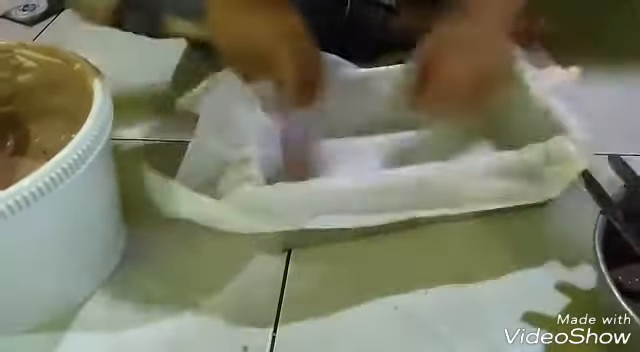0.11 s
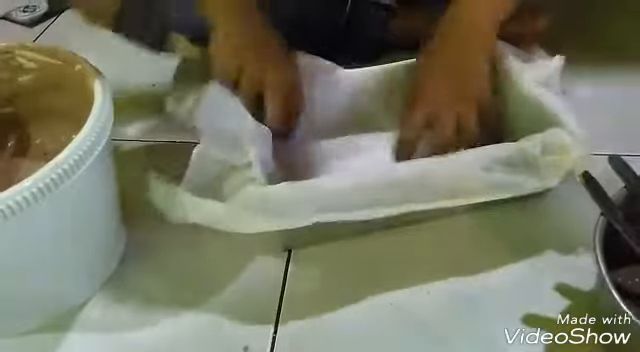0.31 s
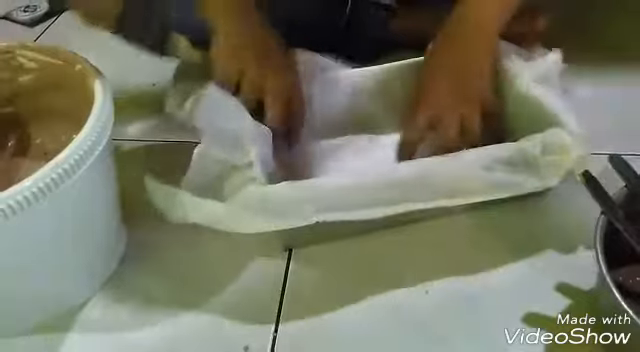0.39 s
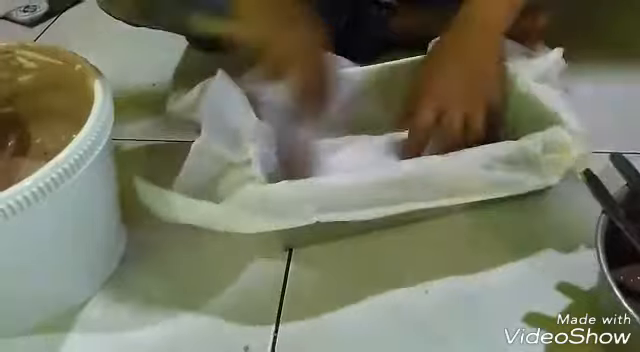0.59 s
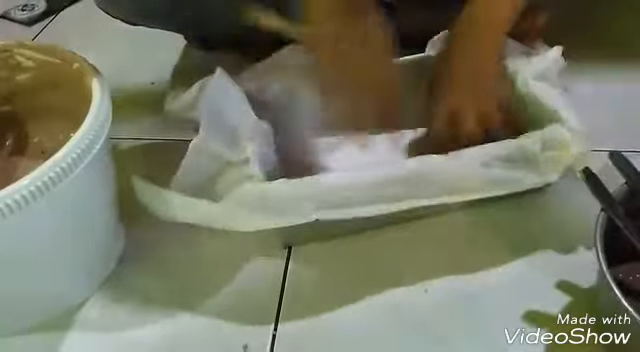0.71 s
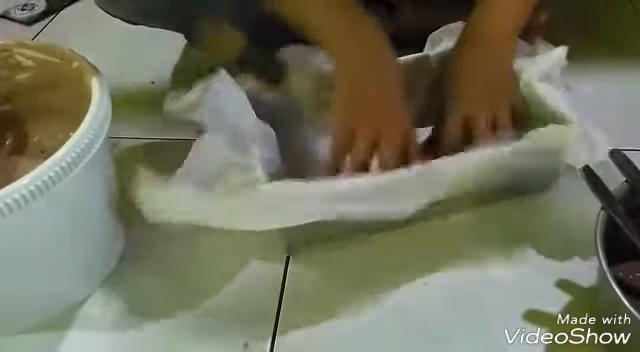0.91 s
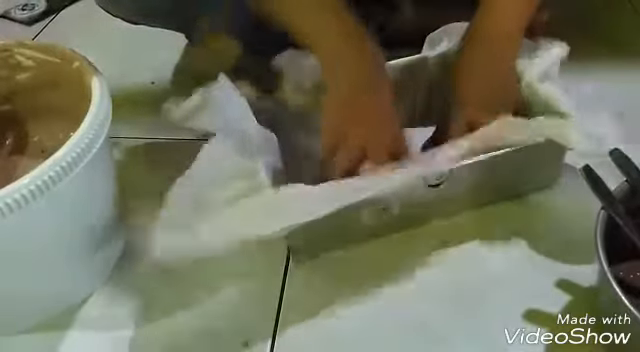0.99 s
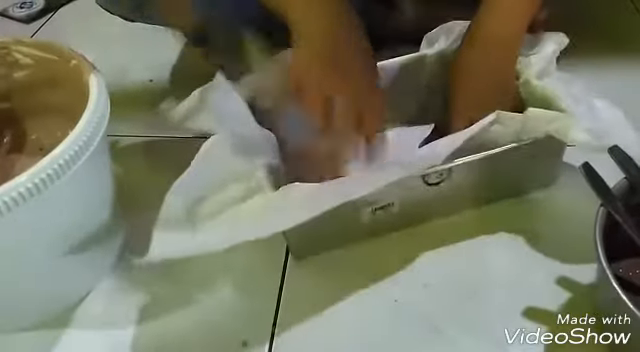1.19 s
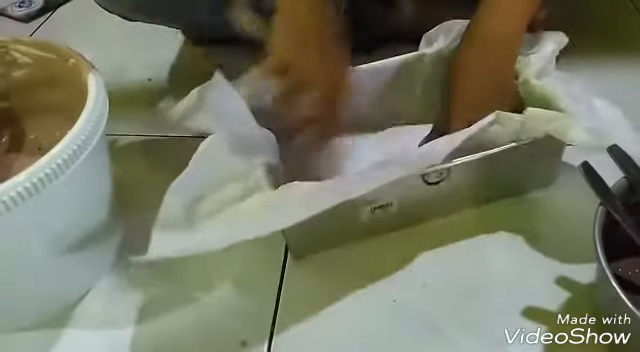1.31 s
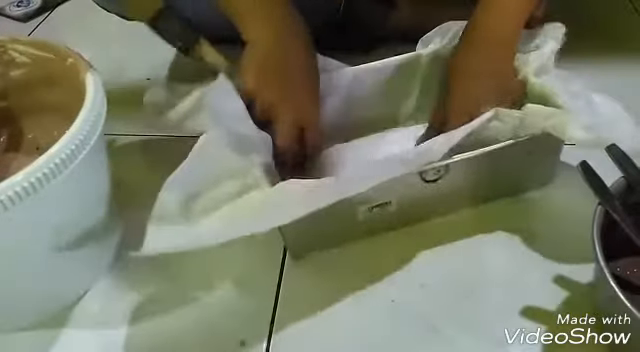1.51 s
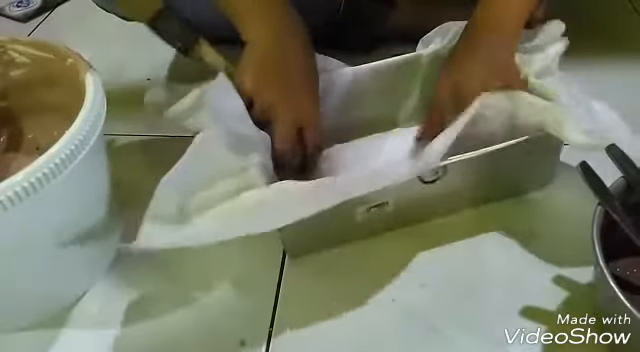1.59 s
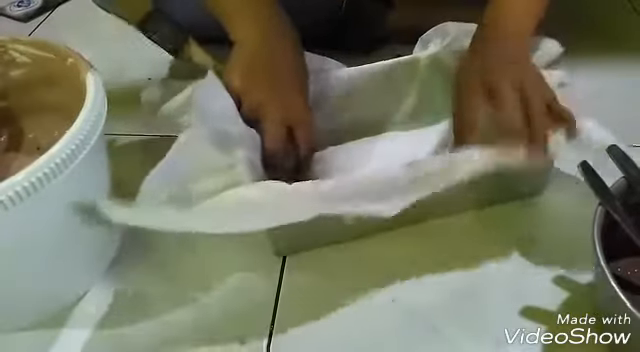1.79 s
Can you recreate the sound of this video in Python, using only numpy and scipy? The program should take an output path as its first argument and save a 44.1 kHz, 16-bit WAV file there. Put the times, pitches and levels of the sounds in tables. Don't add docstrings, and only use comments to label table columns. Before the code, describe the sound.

Bright, dry paper crinkling starts at once, smacks the tin early, then comes in dense loud clusters with short lulls between; faint finger taps on metal, short room echo, slightly overloaded close phone microphone.

```python
import sys
import numpy as np
from scipy import signal
from scipy.fft import rfft, irfft, next_fast_len
from scipy.io import wavfile
from scipy.ndimage import uniform_filter1d, minimum_filter1d, map_coordinates

SR = 44100
rng = np.random.default_rng(int(sys.argv[2]) if len(sys.argv) > 2 else 0)


def dump(signal):
    limited = np.clip(np.atleast_2d(signal).T, -1, 1)
    pcm = np.round(limited * 32767).astype(np.int16)
    wavfile.write(sys.argv[1], SR, pcm)


def to_linear_factor(level_db):
    exponent = np.asarray(level_db, float) / 20
    return 10 ** exponent


N = 83790
TIME_S = np.arange(N) / SR


def unit(x):
    return x / np.sqrt(np.mean(x ** 2) + 1e-20)


def along(points, hz):
    point_hz, value = np.transpose(points)
    return np.interp(np.log(hz + 1), np.log(point_hz + 1), value)


def filtered(x, response):
    size = next_fast_len(N + SR // 2)
    hz = np.fft.rfftfreq(size, 1 / SR)
    return irfft(rfft(x, size) * response(hz), size)[..., :N]


def wobble(rate_hz):
    knots = rng.standard_normal(int(N * rate_hz / SR) + 4)
    return map_coordinates(knots, [np.arange(N) * rate_hz / SR])


def coloured(spectrum, shared, lag_s):
    z = signal.stft(rng.standard_normal((2, N)), nperseg=512)[2]
    patches = uniform_filter1d(rng.standard_normal(z.shape[1:]), size=4, axis=0)
    patches = uniform_filter1d(patches, size=8, axis=1)
    patch_db = 3.5 * unit(patches)
    common, own = signal.istft(z * to_linear_factor(patch_db), nperseg=512)[1][:, :N]
    right = shared * common + np.sqrt(1 - shared ** 2) * own

    def colour_and_lag(hz):
        return to_linear_factor(along(spectrum, hz)) * np.exp(-2j * np.pi * hz * [[lag_s], [0]])

    return unit(filtered(np.array([common, right]), colour_and_lag))


def creases(rate_hz):
    chance, size = rng.random((2, N))
    spikes = (chance < rate_hz / SR) * to_linear_factor(-1.7 * np.log(size + .004))
    t = np.arange(SR // 20) / SR
    buckle = to_linear_factor(-60 * t / .005) * (1 - np.exp(-t / 0.000083))
    swarm = np.abs(signal.fftconvolve(spikes, buckle / buckle.max())[:N])
    return unit(swarm * to_linear_factor(1.2 * wobble(70.36)))


def held(start_s, length_s, change_db, attack_s, release_t60_s=0.05):
    since = TIME_S - start_s
    slope_db = change_db * np.clip(since / length_s - .5, -.5, .5)
    release_db = -60 * np.maximum(since - length_s, 0) / release_t60_s
    return np.clip(since / attack_s + (start_s == 0), 0, 1) * to_linear_factor(slope_db + release_db)


def half_widths(start_s, width_ms):
    return 2000 * (TIME_S - start_s) / max(width_ms, .5)


# start_s, length_s, level_db, tin_share_db, change_db over the press
PRESSES = [(0, 0.05, -27, -15.5, -6), (0.021, 0.051, -26, -10.5, 4.5), (0.086, 0.069, -50.5, 12.5, -17),
           (0.2043, 0.0037, -21, -16, 14), (0.292, 0.062, -28.5, -12, 6),
           (0.356, 0.048, -13.5, -6.5, -10.5), (0.409, 0.11, -17, -16, -2), (0.551, 0.052, -38.5, -6.5, 7),
           (0.608, 0.075, -25, -14.5, 5), (0.841, 0.034, -24, -12.5, 16), (0.891, 0.029, -18, -15.5, -2),
           (0.928, 0.025, -36.5, -3.5, 4), (0.959, 0.027, -22, -9, 8), (0.986, 0.19, -14.5, -15, -9.5),
           (1.182, 0.041, -24, -17, 4), (1.234, 0.1, -37.5, -12.5, -26), (1.383, 0.066, -49, -4, -5),
           (1.448, 0.034, -33, -15.5, 27.5), (1.479, 0.032, -14, -18, 11), (1.526, 0.061, -19.5, -17.5, 23),
           (1.635, 0.037, -34, -17, 9), (1.664, 0.09, -23.5, -13, -7), (1.755, 0.044, -31.5, -16, -1),
           (1.83, 0.067, -27.5, -9.5, -12), (1.803, 0.028, -35, -9, 0)]
# start_s, level_db, width_ms, tin_share_db
SNAPS = [(0.095, -11, 4, -33), (.102, -39, 2.7, -23), (.1426, -26.5, 4.6, -21), (.1605, -30, 2.5, -27),
         (0.2002, -30.5, 2.9, -6), (0.3456, -0.5, 5.6, -27.5), (.3885, -14, 4.3, -12),
         (0.4033, -5.5, 3.3, -17), (.428, -20, 3.8, -25), (.452, -8, 1.9, -30), (0.4605, 0, 2.2, -19),
         (0.4771, -1, 0.96, -41), (0.489, -3, 0.77, -47), (1.0101, -8, 1.3, -13.5), (0.4968, -7, 1.5, -35),
         (0.5225, -4, 4.4, -23), (0.5257, -6, 2.9, -26), (.5353, -2, 2.3, -31), (0.5446, 2.5, 2.6, -29),
         (0.709, -34, 4.4, -34), (0.791, -25.5, 2.3, -35), (0.85, -20, 1.6, -37), (.8573, -17, 2.4, -19),
         (0.87, 3.5, 1.8, -17.5), (0.8824, -13.5, 5.8, -14.5), (0.9108, -13, 6.2, -30),
         (0.9695, -7.5, 1.3, -23), (1.031, -5, 2.7, -18), (1.0693, -10, 2.5, -32), (1.113, -11, 1.3, -13.5),
         (1.1334, -12.5, 7.6, -17.5), (1.1543, -6, 4.8, -20.5), (1.17, -11.5, 3.1, -31),
         (1.222, -26, 2.4, -33), (1.3173, -28, 1.8, -29), (1.378, -22, 0.56, -45), (1.3816, -32, 3, -40),
         (1.387, -35, 1, -28), (1.3932, -35, 1.5, -24), (1.472, -18, 5.2, -41), (1.506, -7.5, 10, -32.5),
         (1.5182, -2.5, 5.6, -22), (1.5358, -18, 2.6, -30), (1.573, -15, 4.2, -25), (1.591, 2, 6.8, -20),
         (1.6155, 6, 3.7, -35.5), (1.677, -15, 9.3, -22), (1.683, -24, 1.9, -35), (1.766, -13, 5.5, -28),
         (1.782, -17, 7.2, -24.5)]
# freq_hz, level_db per hz
PAPER_COLOUR = [(1500, -42.5), (2500, -12.5), (3300, -12), (4100, -18), (5000, -9.5), (8000, -7.5),
                (10900, 2), (14200, -8)]
SHEET_SHARED, SHEET_LAG_S = 0.09, 0.0004965


def sheet():
    press = snap = 0
    for start_s, length_s, level_db, _, change_db in PRESSES:
        press = press + to_linear_factor(level_db) * held(start_s, length_s, change_db, 0.19 * length_s)
    for start_s, level_db, width_ms, _ in SNAPS:
        fall = half_widths(start_s, width_ms)
        rise = 1000 * (TIME_S - start_s) / (0.49 + 0.16 * width_ms)
        snap = snap + to_linear_factor(level_db - 5 - 6.57 * np.where(fall < 0, rise ** 2, fall))
    return (press * creases(5000) + snap) * coloured(PAPER_COLOUR, SHEET_SHARED, SHEET_LAG_S)


# freq_hz, level_db per hz
SLAP_COLOUR = [(500, -22.5), (3100, -7), (4100, -9), (5300, -2), (7300, -11.5), (9400, 5.5), (12000, -2),
               (13500, -12.5)]
# freq_hz, gain_db
SLAP_RIGHT_TOP = [(5000, -0.5), (8500, 1.5), (13000, 4)]


def slap():
    start_s, length_s, attack_s = .2112, 0.031, 0.0028
    smack = held(start_s, length_s, -7, attack_s, 0.014)
    shiver = to_linear_factor(-23) * held(start_s, length_s, 0, attack_s, 0.4) * (TIME_S < PRESSES[5][0])
    drive = to_linear_factor(-1.5) * (smack + shiver) * creases(5000)
    ports = drive * to_linear_factor([[0], [1]]) * coloured(SLAP_COLOUR, SHEET_SHARED, SHEET_LAG_S)
    return filtered(ports, lambda hz: to_linear_factor(along(SLAP_RIGHT_TOP, hz) * [[0], [1]]))


# freq_hz, level_db per hz
TIN_COLOUR = [(20, -44), (60, -11), (250, -2.5), (500, -5.5), (700, -1.5), (2000, -1), (3300, -8),
              (4200, -3)]


def tin():
    press = thud = 0
    for start_s, length_s, level_db, tin_share_db, change_db in PRESSES:
        shape = held(start_s, length_s, change_db, 0.19 * length_s)
        press = press + to_linear_factor(level_db + tin_share_db + 4) * shape
    for start_s, level_db, width_ms, tin_share_db in SNAPS:
        u = half_widths(start_s, width_ms)
        thud = thud + to_linear_factor(level_db + tin_share_db - 5.03 * np.where(u < 0, u * u, u / 4))
    body = (press * creases(2200) + thud) * coloured(TIN_COLOUR, 0.78, 0.000093)
    return filtered(body, lambda hz: 1 / (1 + (hz / 5000) ** 4))


# start_s, level_db, pitch_hz, t60_s
KNOCKS = [
    (.096, -29.5, 620, 0.022),
    (.116, -26.5, 1080, 0.017),
    (.133, -25.5, 1040, .018),
    (0.79, -40, 4140, 0.045),
    (1.3856, -21.5, 2890, 0.0065),
    (1.391, -28, 2750, 0.015),
]


def knocks():
    out = np.zeros(N)
    for start_s, level_db, pitch_hz, t60_s in KNOCKS:
        since = np.maximum(TIME_S - start_s, 0)
        ring = np.sin(2 * np.pi * pitch_hz * since + wobble(500)) + .15 * wobble(5000)
        rise = 1 - np.exp(-since / (0.056 * t60_s))
        out = out + to_linear_factor(level_db - 60 * since / t60_s) * rise * ring
    return out


# start_s, length_s, level_db, first_hz, last_hz, noise_over_tone, noise_width_hz
SQUEAKS = [
    (.755, .11, -50, 2250, 2480, .4, 120),
    (1.405, .08, -50, 3000, 2700, 3, 450),
]


def squeaks():
    out = np.zeros(N)
    for start_s, length_s, level_db, first_hz, last_hz, noisy, width_hz in SQUEAKS:
        u = np.clip((TIME_S - start_s) / length_s, 0, 1)
        glide_hz = first_hz + (last_hz - first_hz) * np.minimum(2 * u, 1) + 25 * wobble(150)
        rough = (1 + noisy * wobble(width_hz)) / np.hypot(1, noisy)
        swell = np.sqrt(np.abs(np.sin(np.pi * u))) * (u < 1)
        out = out + to_linear_factor(level_db) * rough * swell * np.sin(2 * np.pi * np.cumsum(glide_hz) / SR)
    return out


# freq_hz, t60_s
ROOM_DECAY = [(200, 0.27), (3000, 0.36), (12000, 0.18)]


def room(x):
    hz, t, z = signal.stft(rng.standard_normal((2, SR // 2)), SR, nperseg=256)
    decay = to_linear_factor(-60 * t / along(ROOM_DECAY, hz)[:, None])
    tail = signal.istft(z * decay, SR, nperseg=256)[1]
    delayed = np.pad(x, ((0, 0), (200, 0)))
    return signal.fftconvolve(delayed, tail / np.linalg.norm(tail[0]), axes=1)[:, :N]


# freq_hz, level_db per hz
FLOOR_COLOUR = [(25, -9), (300, -15), (1200, -24), (2600, -12), (4700, -29), (7000, -24), (10500, -16),
                (14500, -33)]


def kitchen_quiet():
    return to_linear_factor(-50.5 + 0.83 * wobble(8.1)) * coloured(FLOOR_COLOUR, 0.69, 0)


def scene():
    fingers = knocks() + squeaks()
    near = sheet() + slap() + tin() + np.array([fingers, -.5 * fingers])
    return near + to_linear_factor(-9.5) * room(near) + kitchen_quiet()


# freq_hz, rarity
DROPOUT_RARITY = [(60, 2), (450, 1.6), (650, 3), (2100, 2.3), (2600, 1.5), (3200, 2), (4200, 1.2),
                  (6500, 2.6)]


def dropouts(x):
    hz, _, z = signal.stft(x, SR, nperseg=1024, noverlap=768)
    bands = rng.standard_normal((len(hz) // 6 + 1, z.shape[-1]))
    field = uniform_filter1d(np.repeat(bands, 6, axis=0)[:len(hz)], size=5, axis=1)
    power = np.sum(np.abs(z) ** 2, axis=0)
    level_db = 10 * np.log10(power.sum(axis=0) + 1e-12)
    calm = np.roll(level_db, -2) - np.roll(level_db, 2) < 12
    low_hz, high_hz = 4300, 6600
    band = (hz > low_hz) & (hz < high_hz)
    band_power = power[band].mean(axis=0)
    faint = band[:, None] & (band_power < np.percentile(band_power, 7))
    rarity = np.where(hz < high_hz, along(DROPOUT_RARITY, hz), 9)
    empty = (unit(field) + 2 * faint > rarity[:, None]) & calm
    gain = minimum_filter1d(to_linear_factor(-40 * empty), size=4, axis=1)
    gain = minimum_filter1d(gain, size=2, axis=0)
    return signal.istft(z * gain, SR, nperseg=1024, noverlap=768)[1][:, :N]


def roll_off(x):
    return signal.sosfilt(signal.butter(12, 15280, fs=SR, output="sos"), x)


# time_s, gain_db
DUCKS = [
    (.2045, -24),
    (.834, -20),
    (1.366, -9),
]
# freq_hz, gain_db
LEFT_OVER_RIGHT = [(60, -1), (400, 2.5), (2300, 2), (4300, 0.5), (6000, -0.5), (8500, 5.5), (11000, 16),
                   (14700, 15)]


def record(dry):
    duck_db = sum(db * np.exp(-((TIME_S - time_s) / .0035) ** 2) for time_s, db in DUCKS)

    def ports(hz):
        return np.array([np.ones_like(hz), -to_linear_factor(-along(LEFT_OVER_RIGHT, hz))])

    x = filtered(dry * to_linear_factor(duck_db), ports)
    top, hardness = 2.13, 1.52
    x = x / (1 + np.abs(x / top) ** hardness) ** (1 / hardness)
    x = filtered(dropouts(x), lambda hz: 1 / (1 + (hz / 14350) ** 200))
    return roll_off(np.clip(x, -1, 1))


dry = scene()
out = record(dry)
dump(out)
```